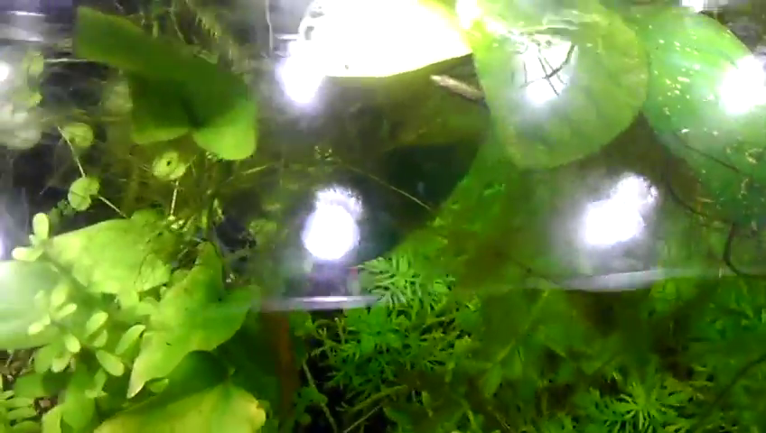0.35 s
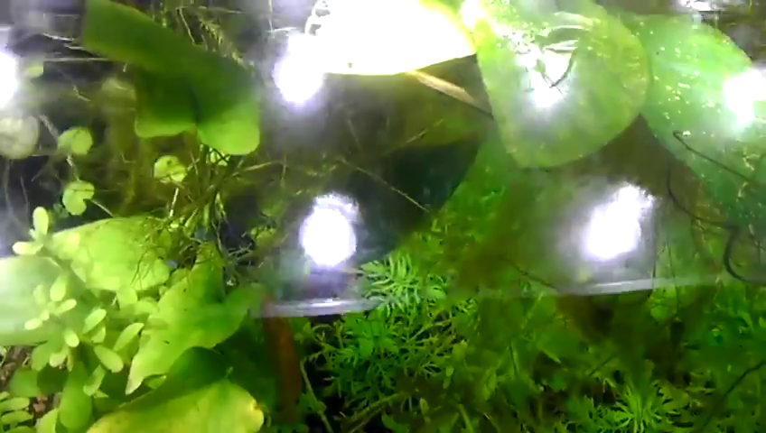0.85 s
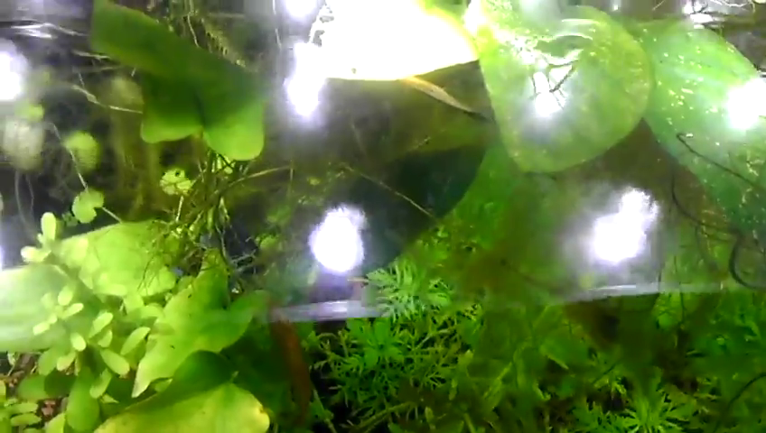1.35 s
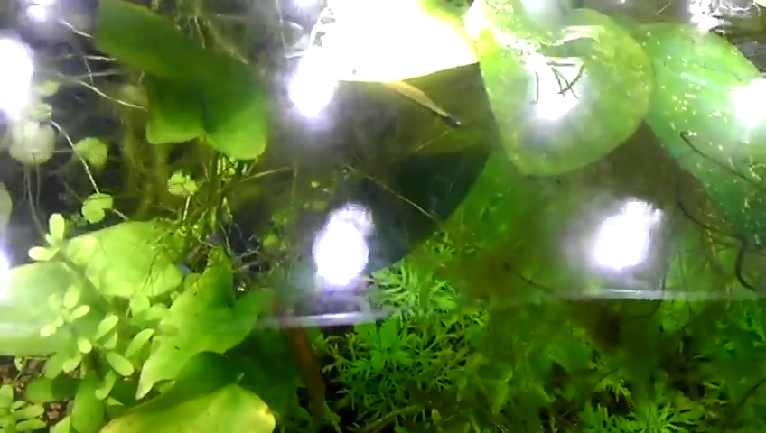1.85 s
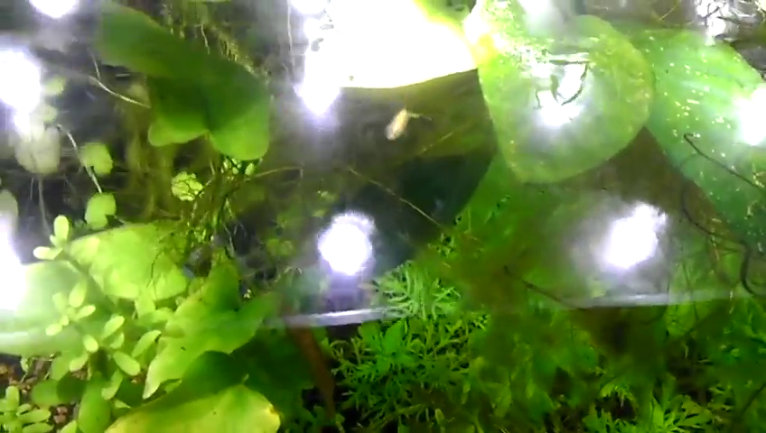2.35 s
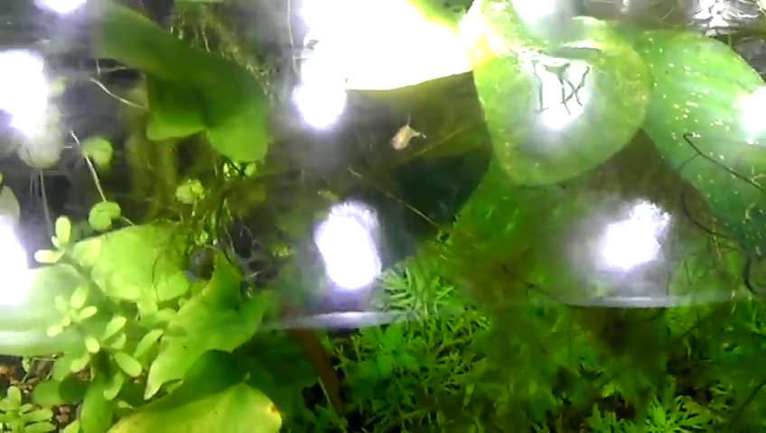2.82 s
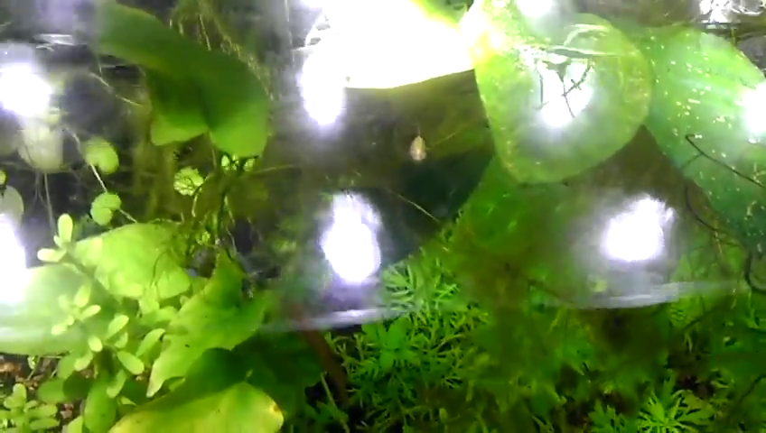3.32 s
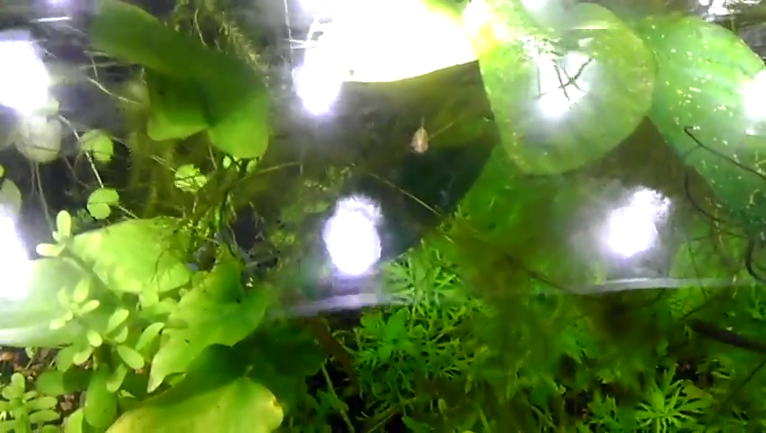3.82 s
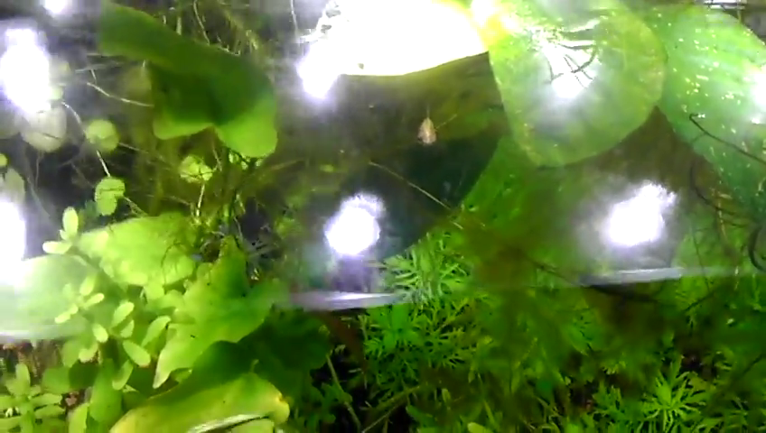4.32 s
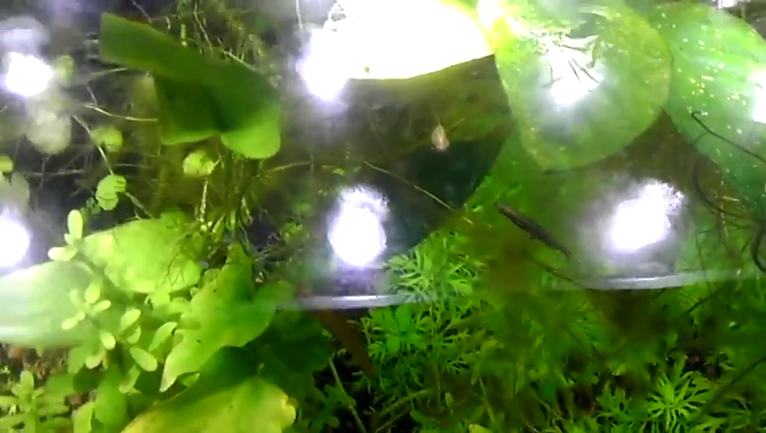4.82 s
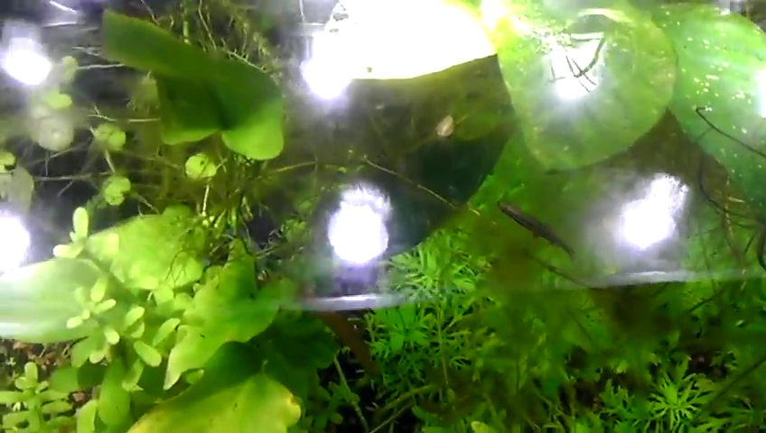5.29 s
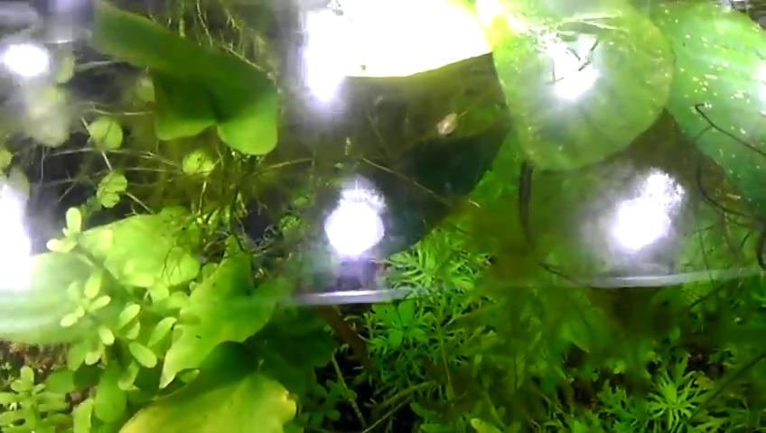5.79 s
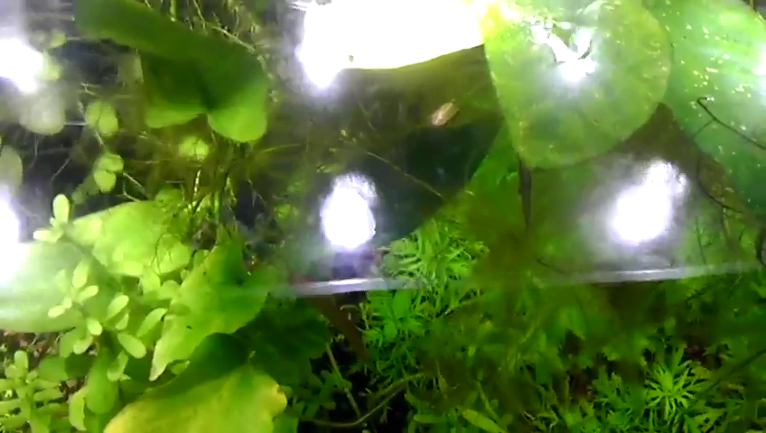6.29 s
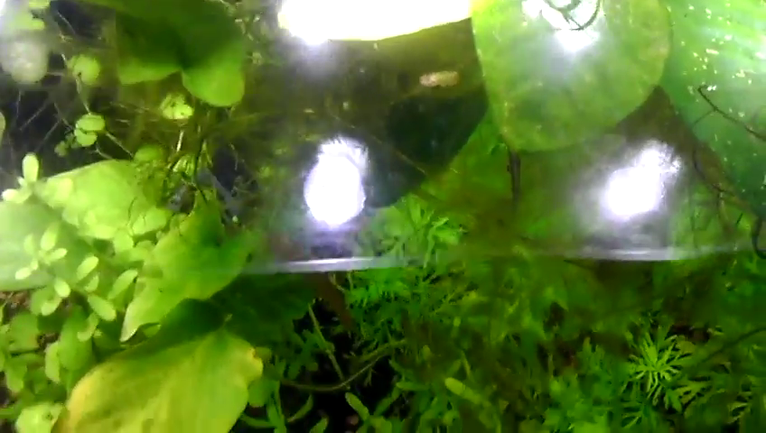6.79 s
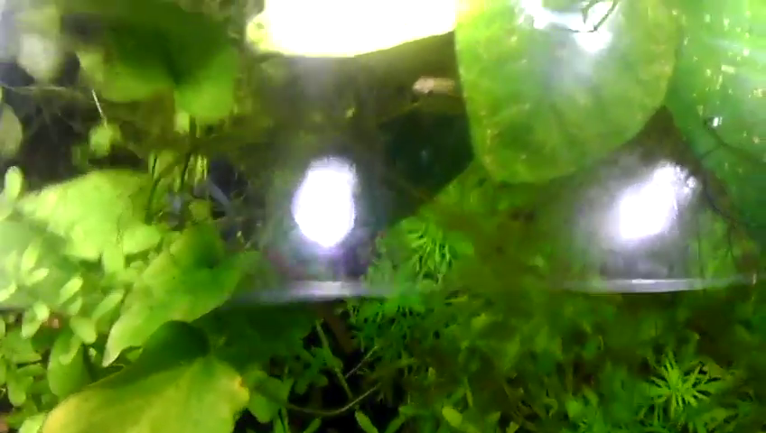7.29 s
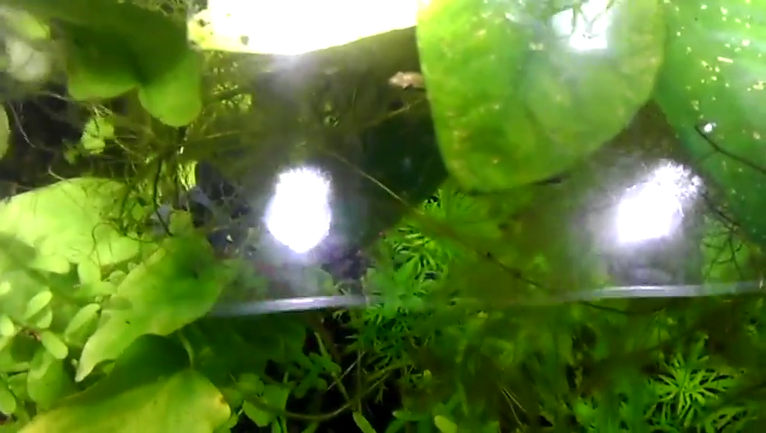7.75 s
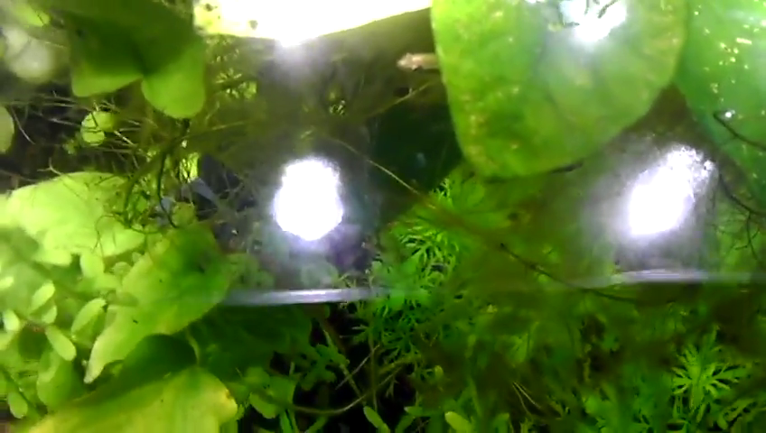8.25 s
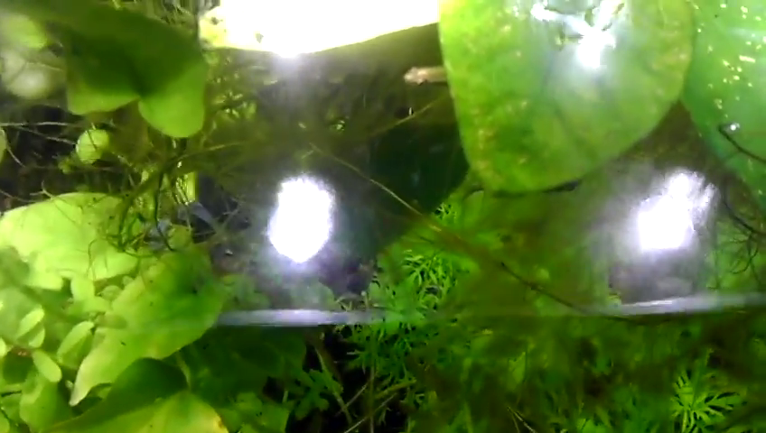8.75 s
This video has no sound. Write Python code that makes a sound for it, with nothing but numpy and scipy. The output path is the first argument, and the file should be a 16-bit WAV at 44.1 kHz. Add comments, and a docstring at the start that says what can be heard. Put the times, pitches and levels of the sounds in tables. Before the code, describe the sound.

A small pump buzzes with a slow throb in a planted tank, water fizzing faintly, hand rubbing the phone, two loud sharp snaps.

```python
"""A mains-driven air pump buzzes in a planted tank indoors; a pump rotor turns slightly slower and throbs against it.
Hum is summed harmonics; pump rattle is gated noise through housing resonances. Water is coloured noise, bubble
puffs and ringing ticks. The hand holding a phone just above the water rubs in slips of noise; its case snaps twice
as falling sweeps with thump and wash. The phone widens its stereo with a short echo of left minus right."""
import sys
import numpy as np
from scipy import signal
from scipy.fft import rfft, irfft
from scipy.io import wavfile
from scipy.ndimage import uniform_filter1d

SR = 44100
rng = np.random.default_rng(int(sys.argv[2]) if len(sys.argv) > 2 else 0)


def nominal_scale(level):
    """Amplitude ratio for a level in decibels (scalar or array-like)."""
    x = np.asarray(level, float) / 20
    return 10 ** x


def unload_audio(sound):
    """Save the sound as a 16-bit wav file, at the path given as the first command line argument."""
    columns = np.transpose(np.atleast_2d(sound))
    # keep every value between -1 and 1, then stretch to whole-number steps
    steps = np.round(np.clip(columns, -1, 1) * 32767)
    wavfile.write(sys.argv[1], SR, steps.astype(np.int16))


N = 391608
T = np.arange(N) / SR
EVENT_SAMPLES = 8192
SIDES = np.array([[1], [-1]])  # left, right sign of the side signal
MAINS_HZ, ROTOR_HZ = 60.0132, 58.2752
TOP_HZ = 13950


def colour(x, table, column=1):
    """Filter by (hz, db) points joined on a log-frequency axis."""
    table = np.array(table, float)
    f = np.fft.rfftfreq(x.shape[-1], 1 / SR) + 1
    db = np.interp(np.log(f), np.log(table[:, 0]), table[:, column], left=-70)
    return irfft(rfft(x) * nominal_scale(db), x.shape[-1])


def level(x, db):
    """Set the rms over all samples and channels."""
    return x * nominal_scale(db) / np.sqrt(np.mean(x ** 2))


def unit_peak(x):
    """Scale both rows so that the first peaks at 1."""
    return x / np.abs(x[0]).max()


def band(x, hz, width_hz):
    """One resonance, gain 1 at the centre."""
    return signal.lfilter(*signal.iirpeak(hz, hz / width_hz, fs=SR), x)


def bright(x):
    """Two high resonances of the microphone ports; two passes steepen the skirts."""
    upper = band(band(x, 12800, 3000), 12800, 3000)
    lower = band(band(x, 9250, 1900), 9250, 1900)
    return upper + 0.74 * lower


def walk(rate_hz):
    """Slow random wander with a spread near 1."""
    k = int(SR / rate_hz)
    steps = np.repeat(rng.standard_normal(N // k + 1), k)
    return 1.81 * uniform_filter1d(uniform_filter1d(steps, k), k)[:N]


def decay(t, t60_s):
    """Exponential fall of 60 dB in t60_s."""
    return np.exp(-np.log(1000) * t / t60_s)


def fade(t60_s, rise_s=0.00026):
    """Noise that rises quickly and dies away, two unrelated rows."""
    t = T[:EVENT_SAMPLES]
    return rng.standard_normal((2, EVENT_SAMPLES)) * (1 - np.exp(-t / rise_s)) * decay(t, t60_s)


def add(out, sound, s):
    """Mix a short sound in at a time."""
    i = int(s * SR)
    out[:, i:i + EVENT_SAMPLES] += sound[:, :N - i]


def pan(db):
    """Left and right gains for a left-minus-right level."""
    return nominal_scale(SIDES * db / 2)


def stereo(mid_side, width=.5):
    """Left and right from mid and side rows."""
    mid, side = mid_side
    return mid + width * side * SIDES


def curve(s, db):
    """Breakpoints in time as a gain."""
    return nominal_scale(np.interp(T, s, db))


def hum(hz, orders, start_rad):
    """Slowly wavering harmonics; stand and glass delay each order differently."""
    out = np.zeros((2, N))
    for k, db, left_minus_right_db in orders:
        gain = np.sqrt(2) * nominal_scale(db + 0.15 * walk(1.59))
        phase = k * (2 * np.pi * hz * T + start_rad) + k ** 2
        out += gain * pan(left_minus_right_db) * np.cos(phase)
    return out


# mains hum lines, rms before pan and drift: order, level_db, left_minus_right_db
MAINS_LINES = [(2, -57.7, 3.5), (3, -51.9, 0.6), (4, -47.8, 1.3), (5, -55.3, 0.1), (6, -61.4, 0.6),
               (7, -61.7, 4.5), (8, -66.0, 0.5), (9, -60.0, 0.3), (10, -64.5, -4.3), (12, -72.2, 1.6),
               (16, -69.9, 4.1), (17, -71.2, 1.0), (20, -73.2, 7.1), (27, -68.9, 3.2), (34, -73.0, 2.0),
               (35, -71.5, -2.5)]


def mains_hum():
    """Harmonics of the mains drive."""
    return hum(MAINS_HZ, MAINS_LINES, 0)


# rotor hum lines, rms before pan and drift: order, level_db, left_minus_right_db
ROTOR_LINES = [(1, -61.1, 0.8), (3, -57.6, -1.1), (4, -50.9, 1.8), (5, -65.7, 1.1), (6, -70.5, 1.7),
               (7, -61.6, 1.8), (8, -71.3, -1.1), (9, -69.9, 1.7)]


def rotor_hum():
    """Harmonics of the slower rotor beat against the mains lines."""
    return hum(ROTOR_HZ, ROTOR_LINES, 5.22)


# pump housing modes, gain before width compensation: pitch_hz, width_hz, gain_db
HOUSING_MODES = [(891, 13, 2), (1306, 24, 2), (1624, 27, 1.5), (2094, 78, -1.5), (2158, 83, 8.5),
                 (2360, 62, 0), (2594, 46, -5.5)]


def housing(x):
    """Hollow resonances of lid and pump housing, compensated for bandwidth."""
    return sum(nominal_scale(db) * band(x, hz, width_hz) * np.sqrt(100 / width_hz)
               for hz, width_hz, db in HOUSING_MODES)


def air_pump():
    """The valve rattles twice a mains cycle, unevenly, and rings the housing; low and high waver apart."""
    gate = (1 + 0.33 * np.cos(2 * np.pi * 2 * MAINS_HZ * T)) * nominal_scale(1.1 * walk(13))
    rattle = stereo(rng.standard_normal((2, N)) * gate)
    low = signal.lfilter(*signal.butter(2, 1900, fs=SR), rattle)
    high = rattle - low
    wavering = low * nominal_scale(1.4 * walk(12)) + high * nominal_scale(0.52 * walk(25))
    return level(housing(wavering), -53.5)


# flow and room noise, relative spectrum: pitch_hz, density_db, side_minus_mid_db
FLOW_COLOUR = [(20, -32, -14), (45.5, -28, -4), (90, -21, 0), (157, -7, -10.5), (316, -3.5, -9.5),
               (384, -12, -14.5), (880, -14.5, -10), (1487, -17.5, 1.5), (2640, -23.5, -6), (3100, -41, 4),
               (4840, -30, -3.5), (6160, -54.5, 7.5), (10000, -34.5, -3), (12900, -38, -8), (14000, -61, 1)]


def flow():
    """Moving water over the room's hush; stereo width varies with frequency."""
    mid, side = colour(rng.standard_normal((2, N)), FLOW_COLOUR)
    both = mid + colour(side, FLOW_COLOUR, column=2) * SIDES
    return level(both * nominal_scale(0.7 * walk(4)), -47)


# surface fizz, gain on unit-rms noise before pan; the swell near 8.2-8.4 s is the hand's bright rub: time_s,
# gain_db
FIZZ_LEVEL = [(0, -66.5), (1.0, -62.5), (2.1, -62), (2.6, -63), (2.9, -62.5), (3.6, -65.5), (5.2, -63),
              (7.2, -63), (8.1, -60), (8.2, -57), (8.35, -52.5), (8.45, -70), (8.88, -61)]


def fizz(per_s=450, spread_db=4.5, t60_s=0.011):
    """Tiny bubbles burst in flurries: short overlapping bright puffs of uneven size; the late treble swell is
    the hand's bright rub on the case."""
    when, size = rng.random((2, N))
    sizes_db = -spread_db * np.log(size + 1e-4)
    flurries_db = 0.69 * walk(15) + 1.6 * walk(6.9)
    bursts = (when < per_s / SR) * nominal_scale(sizes_db + flurries_db)
    swell = signal.lfilter([1], [1, -decay(1 / SR, t60_s)], bursts)
    puffs = stereo(bright(rng.standard_normal((2, N)) * swell))
    return level(puffs, 0) * curve(*np.transpose(FIZZ_LEVEL)) * pan(9)


# skin on case, relative spectrum: pitch_hz, density_db
RUB_COLOUR = [(250, 4.5), (600, 8.5), (1500, -8.5), (3000, -5), (4600, -8.5), (6300, -20.5), (7600, -17),
              (10000, -14), (14000, -26)]
# hand slides, gain on unit-rms rub: full_s (end of attack), hold_s, gain_db
HAND_SLIDES = [(0.0, 0.21, -50), (0.12, 0.061, -49), (0.243, 0.23, -48), (1.127, 0.048, -54),
               (1.77, 0.017, -55), (1.88, 0.027, -62), (2.254, 0.016, -57), (2.652, 0.17, -70),
               (4.35, 0.015, -79), (4.49, 0.02, -59), (5.295, 0.011, -58), (5.793, 0.012, -51),
               (5.882, 0.0079, -66), (5.943, 0.027, -55), (6.39, 0.15, -56), (6.852, 0.027, -53.5),
               (7, 0.02, -44.5), (7.13, 0.022, -49.5), (7.334, 0.79, -59.5), (8.179, 0.027, -44),
               (8.26, 0.15, -48.5), (8.467, 0.13, -58.5), (8.663, 0.012, -46), (8.753, 0.014, -47)]


def hand():
    """Skin drags over the case in small slips over an unsteady grip; low scuffs and high scrapes slip apart."""
    attack_s, release_s = .025, .04  # linear ramp; exponential time constant
    grip_db, grip_wander_db = -58, 1.5
    rub = level(stereo(colour(rng.standard_normal((2, N)), RUB_COLOUR)), 0)
    low = signal.lfilter(*signal.butter(2, 1200, fs=SR), rub)
    high = rub - low
    drag = nominal_scale(grip_db + grip_wander_db * walk(8))
    for full_s, hold_s, db in HAND_SLIDES:
        rise = np.clip((T - full_s) / attack_s + 1, 0, 1)
        fall = np.exp(-np.maximum(T - full_s - hold_s, 0) / release_s)
        drag = drag + nominal_scale(db) * rise * fall
    return (low * nominal_scale(1.4 * walk(60)) + high * nominal_scale(0.9 * walk(120))) * drag


# loudest bursting bubbles, mid peak before pan: start_s, peak_db, left_minus_right_db
BUBBLE_POPS = [(.0767, -45, 8), (.6574, -46, 4.5), (.7228, -49, 4.5), (2.0453, -41.5, 4.5),
               (2.7107, -42, 5), (2.739, -39, 0), (4.6054, -43, 5), (6.891, -39.5, 7), (7.544, -42, -.5),
               (7.6171, -44, 6), (7.708, -39.5, 8), (7.7785, -43, 0), (7.951, -42, 5), (7.991, -41, 2.5),
               (8.3744, -45, 5), (8.468, -35.5, 2), (8.534, -39, 3), (8.544, -31, 4), (8.7485, -46, 5)]


def pops():
    """Single bubbles burst as bright puffs of noise."""
    out = np.zeros((2, N))
    for s, db, left_minus_right_db in BUBBLE_POPS:
        puff = stereo(unit_peak(bright(fade(0.04, rise_s=0.00058))))
        add(out, nominal_scale(db) * pan(left_minus_right_db) * puff, s)
    return out


def trickle():
    """Faint drips at random, as rows in the columns of the tick table."""
    per_s, level_db, spread_db, t60_s = 7, -46, 3, 0.035
    low_hz, high_hz = 600, 2600
    when, size, pitch, side = rng.random((int(per_s * N / SR), 4)).T
    return np.transpose([when * (N / SR - .2),
                         level_db + spread_db * (2 * size - 1),
                         low_hz * (high_hz / low_hz) ** pitch,
                         np.full(len(when), t60_s),
                         10 * side - 5])


# dull ticks and drips, peak of own mid ring before pan: start_s, peak_db, pitch_hz, t60_s, left_minus_right_db
DULL_TICKS = [(.139, -39, 735, 0.059, -7), (.184, -41, 544, 0.085, -18), (.227, -43, 420, .04, -8),
              (0.794, -32, 2100, 0.19, 0), (1.885, -46, 4540, 0.074, -4), (2.269, -36.5, 2170, 0.098, -3),
              (2.665, -35.5, 880, .051, -1), (2.868, -41, 2350, .05, -3), (2.941, -40.5, 1580, 0.077, 11),
              (2.986, -45, 2450, 0.037, 0), (3.303, -40, 2170, 0.036, -6), (3.568, -37.5, 1310, 0.11, -3),
              (5.308, -35.5, 1600, 0.036, -4), (6.374, -38, 770, 0.019, -13),
              (6.572, -40.5, 2650, 0.035, -4), (7.001, -36.5, 550, 0.052, -10),
              (7.138, -37, 2800, 0.012, -4), (7.15, -38, 583, 0.057, 3), (8.189, -44, 4300, 0.2, 5),
              (8.192, -42, 700, .05, -3)]


def ticks():
    """Ticks and drips crack, swell in their own resonance and wake the housing."""
    width_hz, housing_db, dull_hz = 400, -3.5, 2550  # width of each of two passes
    crack_db, crack_t60_s, crack_hz = -6.5, .03, 1500
    out = np.zeros((2, N))
    dull = signal.butter(4, dull_hz, fs=SR, output="sos")
    for s, db, hz, t60_s, left_minus_right_db in [*DULL_TICKS, *trickle()]:
        gains = nominal_scale(db) * pan(left_minus_right_db)
        own = band(band(fade(t60_s, rise_s=0.001), hz, width_hz), hz, width_hz)
        woken = housing(signal.sosfilt(dull, fade(t60_s)))
        body = unit_peak(own) + nominal_scale(housing_db) * unit_peak(woken)
        crack = unit_peak(band(fade(crack_t60_s, rise_s=0.00024), crack_hz, 0.69 * crack_hz))
        add(out, gains * nominal_scale(crack_db) * crack[0], s)
        add(out, gains * stereo(body, 0.54), s)
    return out


def bend(table, lag_s, lead=64):
    """A click carried by bending waves sweeps downward; minimum-phase resonances ring on after it."""
    f = np.fft.rfftfreq(EVENT_SAMPLES, 1 / SR)
    hz, db = np.transpose(table)
    half = EVENT_SAMPLES // 2
    # folding the cepstrum gives minimum phase
    ceps = irfft(np.log(nominal_scale(np.interp(np.log(f + 1), np.log(hz), db))))
    ceps[1:half] *= 2
    ceps[half + 1:] = 0
    # delay is lag_s * (sqrt(TOP_HZ / f) - 1) plus the lead in samples
    turns = lag_s * (2 * np.sqrt(TOP_HZ * f) - f) + f * lead / SR
    click = irfft(np.exp(rfft(ceps) - 2j * np.pi * turns))
    click = click * (np.arange(EVENT_SAMPLES) < 2048)
    return click / np.abs(click).max()


def ring(hz, t60_s, lag_s=0.):
    """A mode that swells for a cycle after a lag and dies away."""
    t = np.maximum(T[:EVENT_SAMPLES] - lag_s, 0)
    return np.sin(2 * np.pi * hz * t) * (1 - np.exp(-7 * hz * t)) * decay(t, t60_s)


# case snaps, dry sweep peak, other levels relative to it:
# start_s, peak_db, thump_db, side_minus_mid_db, sweep_lag_s, thump_pitch_ratio, side_delay_s, wash_db
CASE_SNAPS = [(5.7485, 4, -12.5, -2.5, 0.00078, 1.05, 0, -22),
              (8.6204, 1, -23.5, -1.5, .0006, 1.5, .00009, -47)]
# mid sweep spectrum, one list per snap: pitch_hz, density_db
SNAP_MID_COLOURS = [
    [(40, -55), (120, -29), (200, -34), (532, 0), (700, -4), (1120, -8.5), (2600, 2.5), (3300, 7.5),
     (3780, 1.5), (4150, 4), (4600, -6), (4900, -1), (6200, -16), (7350, -3), (8100, -12), (8660, -5),
     (10700, -9), (12300, -1), (13600, 1), (14000, -12)],
    [(40, -62), (200, -32), (600, -20), (1100, -20), (1430, -11), (2130, -14), (2800, 4.5), (3500, 3.5),
     (3920, -0.5), (4500, 8.5), (4900, 5.5), (5600, 3.5), (7000, -15.5), (7900, 1), (8600, -39),
     (10100, -0.5), (11900, -2.5), (12350, -22), (12900, 0), (13700, 1), (14000, -27)],
]
# side sweep spectrum, one list per snap: pitch_hz, density_db
SNAP_SIDE_COLOURS = [
    [(40, -45), (250, -12), (600, -12), (1700, -16), (2200, -8), (3400, -6), (4300, 1), (4700, -3),
     (5200, -12), (6500, -17), (10200, -6), (11400, -14), (14000, -22)],
    [(40, -45), (200, -18), (350, -15), (1000, -24), (2200, -18), (3400, -10), (4500, 1), (5000, -4),
     (6100, -19), (7000, -10), (7800, -13), (9400, -6), (11500, -9), (14000, -24)],
]
# hollow case modes, before each snap's pitch ratio and thump level: pitch_hz, gain_db, t60_s
THUMP_MODES = [(150, -15, 0.042), (374, -2, 0.027), (598, -14, 0.053), (860, -15, 0.027),
               (2100, -21, 0.068)]


def snaps():
    """The case snaps: a falling sweep, a hollow thump and a short, mostly side, wash off the glass."""
    out = np.zeros((2, N))
    lead_s = 64 / SR
    for snap, mid_colour, side_colour in zip(CASE_SNAPS, SNAP_MID_COLOURS, SNAP_SIDE_COLOURS):
        s, db, thump_db, side_db, lag_s, pitch, delay_s, wash_db = snap
        add(out, nominal_scale(db) * bend(mid_colour, lag_s)[None], s - lead_s)
        add(out, nominal_scale(db + side_db) * bend(side_colour, 0.8 * lag_s) * SIDES, s + delay_s - lead_s)
        thump = sum(nominal_scale(g) * ring(hz * pitch, t60_s, 0.0018) for hz, g, t60_s in THUMP_MODES)
        mid, side = band(fade(0.07), 4100, 8000)
        wash = nominal_scale(wash_db) * (0.12 * mid + side * SIDES)
        add(out, nominal_scale(db) * (nominal_scale(thump_db) * pan(3) * thump + wash), s)
    return out


# phone drifts nearer the pumps: time_s, hum_gain_db, housing_gain_db
PHONE_DRIFT = [(0, 0, -0.5), (6.3, 0, 1), (7.3, 1, 4), (8.1, 1, 3.5), (8.88, 1, 6.5)]


def scene():
    """Pumps, water, hand and case."""
    s, hum_db, housing_db = np.transpose(PHONE_DRIFT)
    lines = mains_hum() + rotor_hum()
    pumps = lines * curve(s, hum_db) + air_pump() * curve(s, housing_db)
    return pumps + flow() + fizz() + hand() + pops() + ticks() + snaps()


def roll_off(x):
    """The treble ends steeply here."""
    return signal.sosfilt(signal.butter(12, 14700, fs=SR, output="sos"), x)


def record(dry):
    """Left minus right, high-passed, repeats 5 ms late to widen the picture; peaks clip, the top is cut."""
    lag, clip_at = 221, .9  # samples, full scale 1
    side = signal.lfilter(*signal.butter(1, 269, "high", fs=SR), (dry[0] - dry[1]) / 2)
    late = np.concatenate([np.zeros(lag), side[:-lag]])
    wide = np.clip(dry + late * SIDES, -clip_at, clip_at)
    cut = signal.sosfiltfilt(signal.ellip(8, .1, 40, TOP_HZ, fs=SR, output="sos"), wide)
    return roll_off(cut)


dry = scene()
out = record(dry)
unload_audio(out)
```